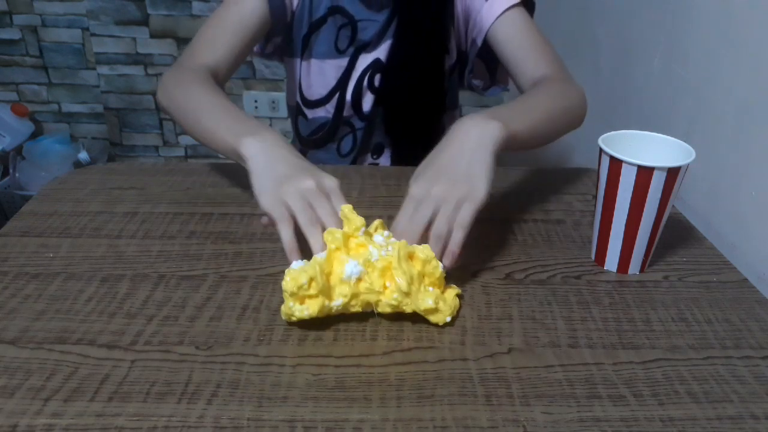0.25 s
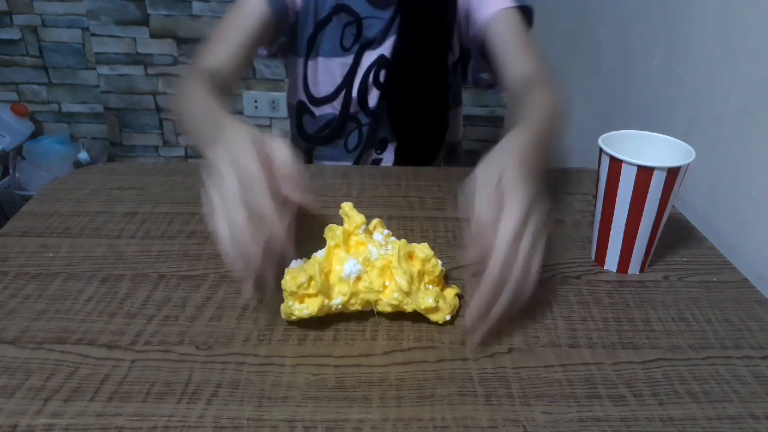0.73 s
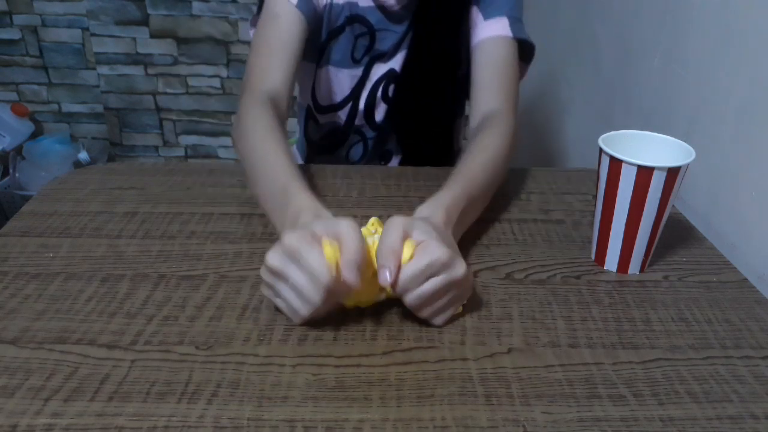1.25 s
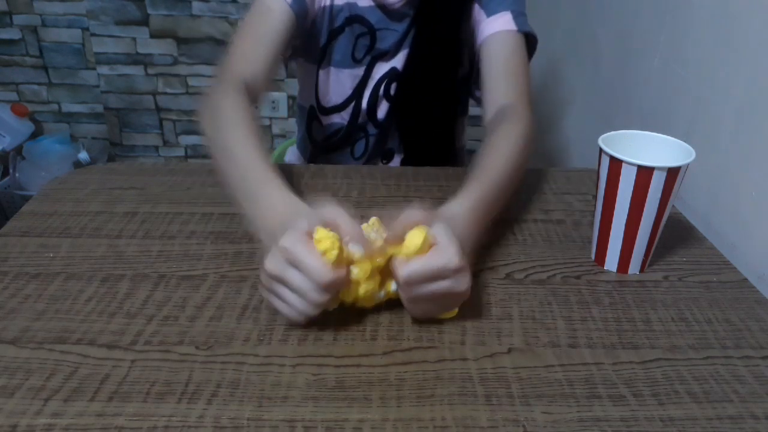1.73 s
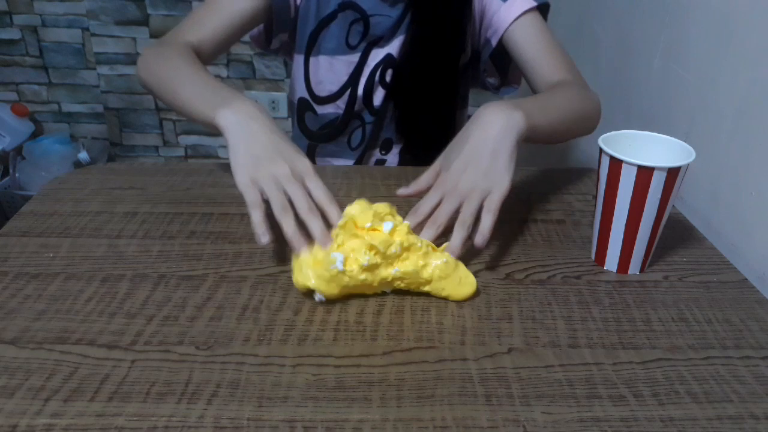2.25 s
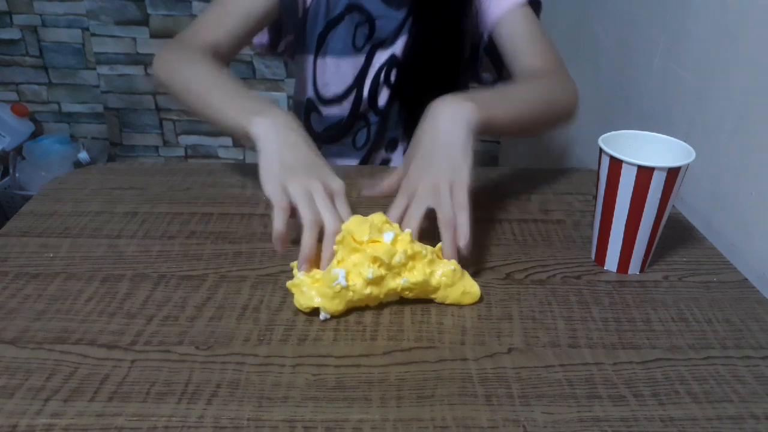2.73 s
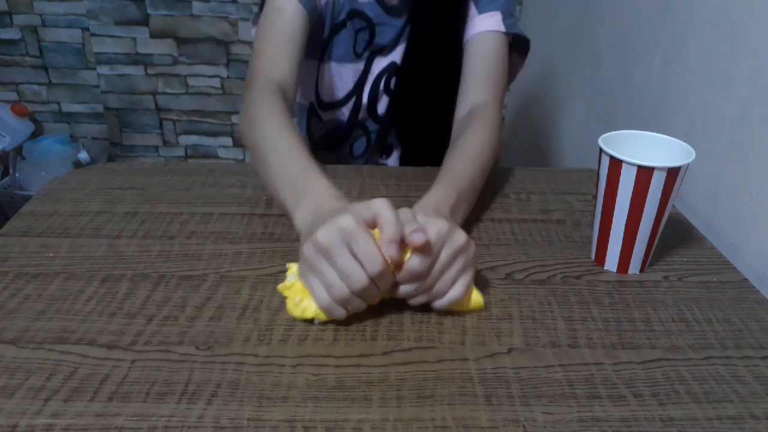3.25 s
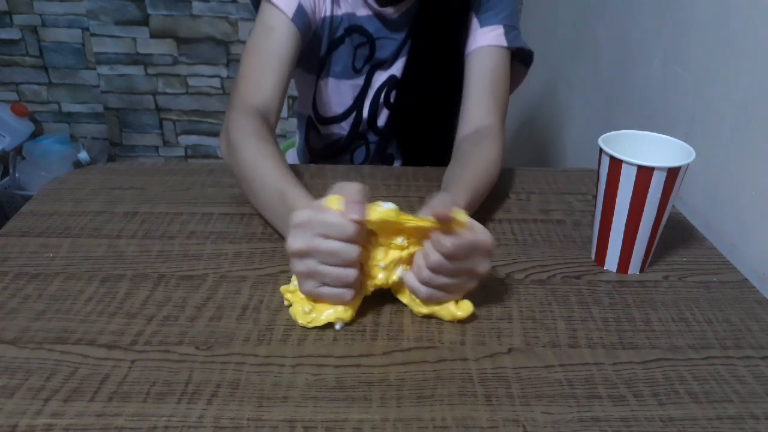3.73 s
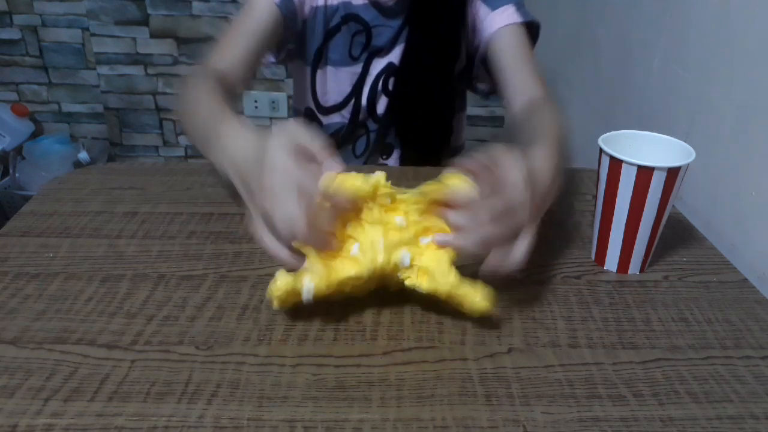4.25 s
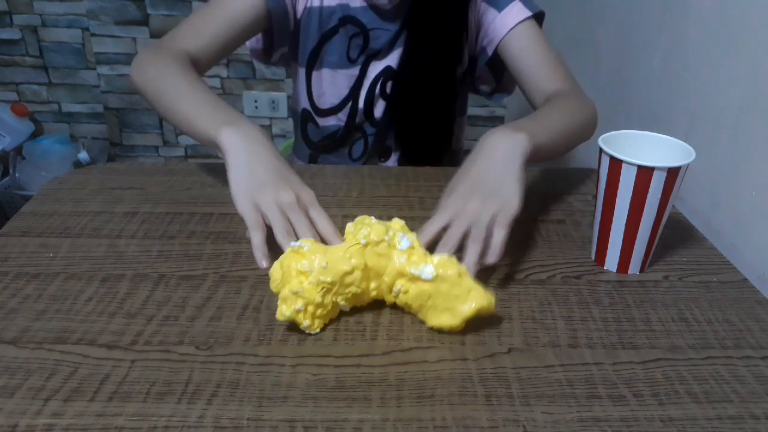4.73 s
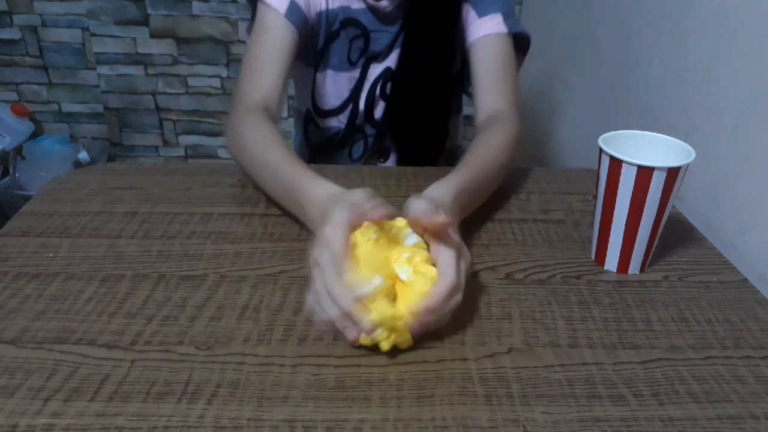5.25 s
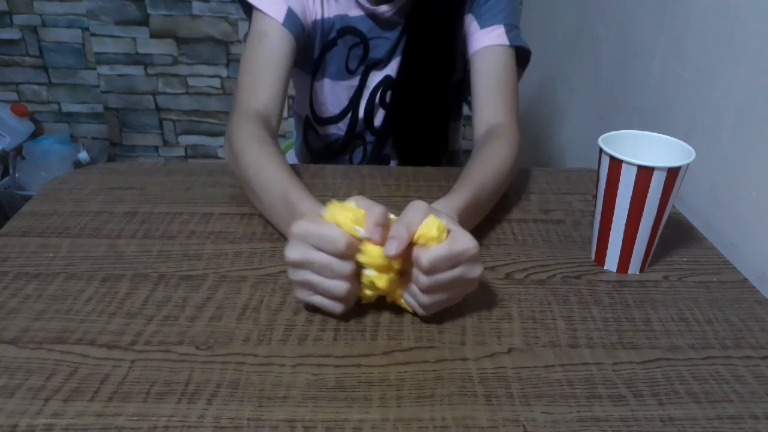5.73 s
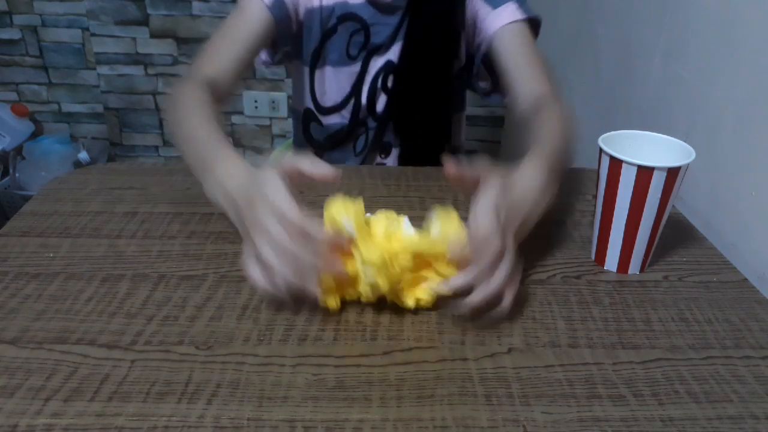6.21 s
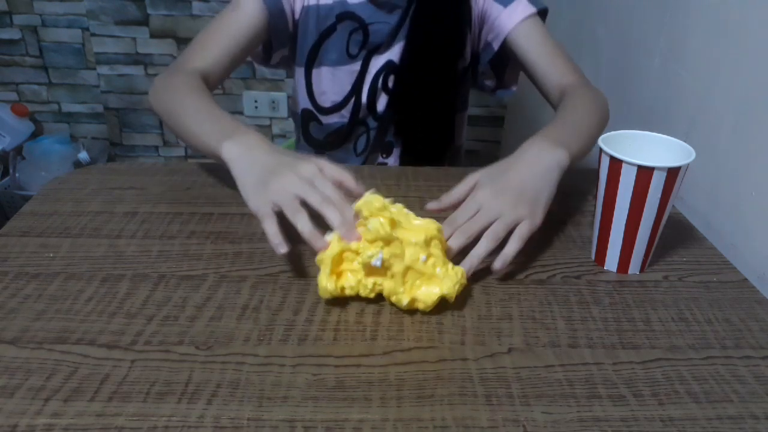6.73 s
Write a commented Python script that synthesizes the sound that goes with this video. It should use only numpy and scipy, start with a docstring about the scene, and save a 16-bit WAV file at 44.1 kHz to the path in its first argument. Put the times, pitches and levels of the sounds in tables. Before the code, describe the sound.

Two hands squeeze and pull a lump of sticky slime full of foam pieces on a wooden table. Raspy peeling and soft bumps come first, then wet squishing with snaps and plops. A dense crackling squeeze follows midway, then strong sticky tearing, another popping squeeze, a tiny squeak and a final rising peel. Close mono microphone in a small room with faint hush and hum.

```python
"""First comes a brief, faint rasp, then a soft bump and a tiny snap: hands knead sticky, foam-filled slime.
Slime peels off skin and wood in runs of tiny slips, made of clicks and short noise bursts.
It squishes as random clicks pass through wet-sounding filters; air pockets pop as dying sines.
Bumps, a knock and a faint drag sound the wooden table, in a small room with a quiet hush and hum."""
import sys
import numpy as np
from scipy import signal
from scipy.io import wavfile
from scipy.ndimage import uniform_filter1d

SR = 44100
rng = np.random.default_rng(int(sys.argv[2]) if len(sys.argv) > 2 else 0)


def put_to_file(sound):
    """Save the sound as 16-bit audio at rate SR, in the file named by the first command-line argument."""
    columns = np.atleast_2d(sound).T  # one column per channel
    safe = np.clip(columns, -1, 1)
    whole_steps = np.round(safe * 32767)
    wavfile.write(sys.argv[1], SR, whole_steps.astype(np.int16))


N = 307377
TIME = np.arange(N) / SR
EDGE_HZ = 16100  # upper band limit of the whole sound

# strips of slime peeling off: start t/s, length/s, level halfway/dB, swell from start to end/dB,
# mellow part relative to the level/dB, slips at the start/(1/s)
PEEL_STROKES = [(0.005, 0.053, -52, 2, -19.5, 325), (0.112, 0.28, -62, -15, -7, 227),
                (0.851, 0.07, -46.5, 2.5, 3, 460), (0.927, 0.045, -44, 2, -3, 405),
                (1.144, 0.055, -53, -1.5, 5, 410), (1.309, 0.27, -48.5, -3.5, -39, 610),
                (1.617, 0.25, -61, 0, -1.5, 360), (1.958, 0.19, -58, -2, -1, 350),
                (2.312, 0.29, -51.5, -6, -11.5, 490), (2.62, 0.096, -50.5, 2.5, -7.5, 850),
                (3.166, 0.25, -53, 6, -6, 122), (3.477, 0.3, -49.5, -0.5, -22, 65),
                (3.97, 0.32, -62, 1.5, -6, 600), (4.29, 0.115, -50.5, -5, -11, 546),
                (4.44, .15, -46, 1, -11.5, 513), (4.577, 0.22, -40, -3, -8.5, 455),
                (4.815, 0.05, -37.5, 2, -20, 550), (5.066, .2, -49, -1.5, -17, 490),
                (5.375, .18, -42, 0, -10, 463), (5.612, 0.1, -42, -2, -8.5, 178),
                (6.018, 0.038, -43, 0.5, -13.5, 570), (6.106, 0.13, -47.5, -10, -11, 470),
                (6.723, 0.097, -58.5, 4, 9, 260), (6.826, 0.23, -42, 13.5, -8, 88)]
# fingers pressing into the lump: start t/s, length/s, level halfway/dB, swell from start to end/dB,
# whether the lump rests on the table (True/False)
SQUEEZE_STROKES = [(0.087, 0.068, -53.5, -8, False), (0.495, 0.075, -58, 2, True),
                   (0.765, 0.043, -52, -15, False), (0.951, 0.14, -57.5, -4, True),
                   (1.106, 0.14, -52, 2.5, True), (1.339, 0.3, -63.5, -12, True),
                   (1.666, 0.6, -62.5, -18, True), (2.236, 0.029, -57.5, 11.5, True),
                   (2.752, 0.075, -54, 0, True), (3.031, .2, -63.5, 4.5, True),
                   (3.228, 0.515, -55, 3.5, False), (3.964, 0.12, -59, 22.5, True),
                   (4.87, 0.031, -49, -6, True), (5.08, 0.286, -63, 7, True),
                   (5.595, 0.37, -58.5, -3, False), (6.081, 0.16, -55.5, -2, True)]
# wet squelches as the fists wring the lump: start t/s, length/s, level halfway/dB,
# swell from start to end/dB, middle of the ringing band f/Hz
SQUELCH_STROKES = [(1.722, .04, -47.5, -3, 1680), (4.026, .16, -59, 3, 1330)]
# small air pockets snapping: t/s, level before trim and filter/dB, f/Hz
SNAP_EVENTS = [(0.11, -40, 5740), (0.3075, -50, 4560), (0.5039, -43, 3730), (1.0064, -31, 6160),
               (1.1533, -39, 10700), (1.2197, -15.5, 6440), (1.3605, -36, 5120), (1.6317, -46.5, 7650),
               (1.767, -39.5, 4080), (1.88, -46, 3200), (1.919, -42, 4540), (1.96, -49, 5900),
               (2.2128, -31, 6230), (2.794, -39.5, 3710), (3.1727, -43, 6940), (3.2773, -43, 3303),
               (3.3349, -40, 7780), (3.4273, -38.5, 8350), (3.444, -38, 8550), (3.4599, -19.5, 9820),
               (3.5121, -34.5, 8920), (3.5333, -33.5, 9500), (3.5549, -37, 3430), (3.588, -36, 8870),
               (3.5969, -17.5, 10200), (3.6617, -28.5, 10450), (3.715, -39.5, 5440), (3.735, -44.5, 6220),
               (3.821, -45.5, 7390), (4.431, -46.5, 8930), (4.985, -53, 9100), (5.014, -49, 8500),
               (5.0644, -42, 10200), (5.259, -45, 11500), (5.3798, -41.5, 6090), (5.5312, -35, 7470),
               (5.619, -34.5, 6415), (5.715, -32.5, 8080), (5.7221, -27, 9660), (5.7903, -10, 7700),
               (5.8922, -35, 9150), (5.925, -35, 8340), (5.939, -39.5, 7900), (6.532, -59, 4480),
               (6.583, -55.5, 5000), (6.6438, -18, 7640)]
# larger cavities opening with a wet plop: t/s, level/dB, starting f/Hz
PLOP_EVENTS = [(1.2, -20.5, 1309), (1.732, -19.5, 1970), (3.285, -33.5, 1600), (3.371, -35.5, 1735),
               (3.46, -25.5, 907), (3.554, -28.5, 1211), (3.596, -29, 796), (3.663, -24.5, 1479),
               (3.715, -27, 1659), (4.101, -36.5, 1090), (5.455, -24, 1521), (5.493, -21, 1707),
               (5.714, -25.5, 1497), (5.7898, -32, 1331)]
# bumps on the table: t/s, peak level/dB, f/Hz, time the soft contact takes to build/s
BUMP_EVENTS = [(0.099, -41.5, 218, 0.0043), (0.554, -39, 200, 0.0066), (0.77, -30.5, 237, 0.0015),
               (0.811, -27.5, 190.5, 0.0023), (1.765, -41.5, 202, 0.0073), (2.795, -37, 191.5, 0.0034),
               (4.054, -46, 210.7, 0.0043), (4.244, -40, 192.6, 0.0022), (4.288, -36.5, 184.9, 0.0018),
               (4.496, -30.5, 187.2, 0.0017), (4.9, -38, 200.2, 0.002), (5.092, -45, 207, 0.0037)]
# first reflections from walls and body: delay/s, level/dB
FIRST_REFLECTIONS = [(.0083, -17), (0.0156, -21)]
# tone colour of the crisp peeling and of the crackle: f/Hz, relative level/dB
CRISP_COLOUR = [(1500, -15), (3500, -12), (5200, -3.5), (6700, -3), (7700, -7.5), (10000, -5), (16000, -24)]
# tone colour of the mellow peeling: f/Hz, relative level/dB
MELLOW_COLOUR = [(900, -28.5), (1900, -21), (2600, -11), (4200, -13.5), (6500, -23), (16000, -31.5)]
# tone colour of the finest tearing threads: f/Hz, relative level/dB
FIZZ_COLOUR = [(7000, -24), (11000, 1.5), (16000, -6.5)]
# tone colour of the squishing: f/Hz, relative level/dB
SQUISH_COLOUR = [(120, -9.5), (350, -5.5), (700, -14), (1250, 2), (1900, -3.5), (3500, -5), (16000, -19)]
# tone colour of the background hush: f/Hz, relative level/dB
HUSH_COLOUR = [(25, -15.5), (50, -11.5), (80, 1), (200, 2), (640, -13), (2600, -20), (16000, -34.5)]

PEEL_ATTACK_S, PEEL_RELEASE_DB_PER_S = 0.028, 450
SQUEEZE_ATTACK_S, SQUEEZE_RELEASE_DB_PER_S = 0.014, 337
LET_GO_SLOWING = 0.68  # share of the slip rate lost by the time a strip comes free
GRIP_WAVER_DB = 1.17  # the pull is never quite even
PEEL_WETNESS_DB, SETTLING_DB = -18.5, -79  # pressing that goes with a peel; that of the lump at rest


def pulling(rest_db=-88, rest_slips_per_s=200):
    """Adds up all peels into strength, mellow strength and slip rate; strong strips count most in the rate."""
    power = np.full(N, gain_of(rest_db) ** 2)
    mellow_power = np.zeros(N)
    weighted_slips = power * rest_slips_per_s
    for s, length, db, swell_db, mellow_db, per_s in PEEL_STROKES:
        gain, progress = stroke(length, db, swell_db, PEEL_ATTACK_S, PEEL_RELEASE_DB_PER_S)
        slowing = 1 - LET_GO_SLOWING * progress ** 4
        add(power, s, gain ** 2)
        add(mellow_power, s, (gain * gain_of(mellow_db)) ** 2)
        add(weighted_slips, s, gain ** 2 * per_s * slowing)
    grip = gain_of(GRIP_WAVER_DB * drift(size=300))
    return grip * np.sqrt(power), grip * np.sqrt(mellow_power), weighted_slips / power


def peeling(pull, mellow_pull, slips_per_s, jitter_per_s=48, uneven_db=1.96, burst_s=0.0024, click=3,
            crisp_db=-3, mellow_db=-3, fizz_db=14, fizz_growth=1.544,
            mirror_s=0.000788, wander=0.088, mirror_db=-10):
    """The slime lets go in slips; each slip clicks and tears a little burst of fine threads."""
    jitter = jitter_per_s / (slips_per_s + jitter_per_s)  # slow peeling stumbles, fast peeling runs evenly
    slip_count = np.cumsum(slips_per_s * np.exp(jitter * drift(size=200))) / SR
    strength = gain_of(uneven_db * rng.standard_normal(N))[slip_count.astype(int)]
    # a burst is brief, so slow peeling ticks and fast peeling rasps
    tearing = strength * np.exp(-(slip_count % 1) / slips_per_s / burst_s)
    release = click * strength * np.diff(np.floor(slip_count), prepend=0)
    threads = release + tearing * rng.standard_normal(N)
    crisp = gain_of(crisp_db) * pull * steadied(colour(threads, CRISP_COLOUR))
    mellow = gain_of(mellow_db) * mellow_pull * steadied(colour(threads, MELLOW_COLOUR))
    # the finest threads come out mainly in a hard pull
    fine_threads = steadied(colour(tearing * rng.standard_normal(N), FIZZ_COLOUR))
    fizz = gain_of(fizz_db) * pull ** fizz_growth * fine_threads
    rasp = crisp + mellow + fizz
    # the nearby table top mirrors the rasp and gives it faint bands that wander slowly at random
    return rasp + gain_of(mirror_db) * delayed(rasp, mirror_s * SR * (1 + wander * drift(size=7000)))


def pressing(pull):
    """How hard the lump is worked (squeezes, a share of each peel, settling), and how hard on the table."""
    power = gain_of(SETTLING_DB) ** 2 + (gain_of(PEEL_WETNESS_DB) * pull) ** 2
    table_power = np.zeros(N)
    for s, length, db, swell_db, on_table in SQUEEZE_STROKES:
        gain, _ = stroke(length, db, swell_db, SQUEEZE_ATTACK_S, SQUEEZE_RELEASE_DB_PER_S)
        add(power, s, gain ** 2)
        add(table_power, s, on_table * gain ** 2)
    return np.sqrt(power), np.sqrt(table_power)


def squishing(press, per_s=550, spread_db=-0.5, level_db=-1):
    """Small wet cells collapse between the fingers."""
    return gain_of(level_db) * press * steadied(colour(ticks(per_s, spread_db), SQUISH_COLOUR))


def crackling(press, per_s=70, spread_db=1.0, level_db=-7):
    """Tiny air pockets snap at random under the fingers."""
    return gain_of(level_db) * press * evened(colour(ticks(per_s, spread_db), CRISP_COLOUR))


def bubbling(press, per_s=80, spread_db=3.5, low_hz=900, high_hz=2100, cycles=0.61, level_db=-6, count=7):
    """Small cavities of several sizes open at random inside the squeezed lump."""
    t = TIME[:SR // 100]
    bubbles = np.zeros(N)
    for hz in np.geomspace(low_hz, high_hz, count):
        bubbles += signal.oaconvolve(ticks(per_s / count, spread_db), ring(hz, cycles / hz, t))[:N]
    return gain_of(level_db) * press * evened(bubbles)


def squelching(q=1.23, per_s=1600, spread_db=0.0):
    """Air and wet slime are forced through a gap between the fingers, which rings broadly."""
    out = np.zeros(N)
    for s, length, db, swell_db, hz in SQUELCH_STROKES:
        gain, _ = stroke(length, db, swell_db, SQUEEZE_ATTACK_S, SQUEEZE_RELEASE_DB_PER_S)
        widening = 1 + 0.5 / q
        gap = signal.butter(2, [hz / widening, hz * widening], "band", fs=SR)
        spurts = ticks(per_s, spread_db)[:len(gain)]
        add(out, s, gain * evened(signal.lfilter(*gap, spurts)))
    return out


def snaps(life_s=0.000085, low_hz=900, high_hz=15000, trim_db=-1, size=176):
    """The skin of a small air pocket breaks with a very short ring."""
    out, t = np.zeros(N), np.arange(size) / SR
    for s, db, hz in SNAP_EVENTS:
        add(out, s, gain_of(db + trim_db) * evened(ring(hz, life_s, t)))
    return signal.lfilter(*signal.butter(1, [low_hz, high_hz], "band", fs=SR), out)


def plops(cycles=1.0, glide=0.099, size=700):
    """A larger cavity opens and rings for a cycle or two, rising as its mouth widens."""
    out, t = np.zeros(N), np.arange(size) / SR
    for s, db, hz in PLOP_EVENTS:
        rising_hz = hz * (1 + glide * t / t[-1])
        add(out, s, gain_of(db) * ring(rising_hz, cycles / hz, t))
    return out


def table_bounce(x, delay_s=0.00074, wander=0.11):
    """The mirror image of a pop in the table top; the short delay wanders slowly at random."""
    return 0.5 * delayed(x, delay_s * SR * (1 + wander * drift(size=9000)))


def scatter(x, life_s=0.001, level_db=-3, low_hz=4500, high_hz=10000):
    """Fingers and foam scatter each pop into a brief ragged crack: noise that follows its treble."""
    keep = np.exp(-1 / (life_s * SR))
    band = signal.butter(1, [low_hz, high_hz], "band", fs=SR)
    power = signal.lfilter([1 - keep], [1, -keep], signal.lfilter(*band, x) ** 2)
    noise = evened(signal.lfilter(*band, rng.standard_normal(N)))
    return gain_of(level_db) * np.sqrt(power) * noise


def hollow(s=5.493, hz=480, width_hz=230, pop_db=-27, pop_s=0.0046, puff_db=-42, puff_s=0.026):
    """A large pocket bursts between the cupped hands, and its puff of air sounds their hollow."""
    t, out = TIME[:SR // 5], np.zeros(N)
    band = signal.butter(2, [hz - width_hz / 2, hz + width_hz / 2], "band", fs=SR)
    air = evened(signal.lfilter(*band, rng.standard_normal(len(t))))
    pop = gain_of(pop_db) * ring(hz, pop_s, t)
    puff = gain_of(puff_db) * air * np.exp(-t / puff_s)
    add(out, s, pop + puff)
    return out


def squeak(s=6.116, length_s=0.01275, base_start_hz=2400, base_end_hz=2000, level_db=-36):
    """Air escapes through a pinhole in one short falling chirp, made of harmonics 3 to 6 of the base."""
    turns = np.cumsum(np.linspace(base_start_hz, base_end_hz, round(length_s * SR))) / SR
    flutter = sum(np.sin(2 * np.pi * k * turns) / (1 + abs(k - 5)) for k in range(3, 7))
    out = np.zeros(N)
    add(out, s, gain_of(level_db) * evened(flutter) * signal.windows.tukey(len(turns)))
    return out


def bumps(life_s=0.011, thud_db=-13, thud_s=0.0017):
    """A soft blow sets the table top booming, with a dull knock on top; softer blows build and fade slower."""
    out, t = np.zeros(N), np.arange(SR // 5) / SR
    band = signal.butter(2, [100, 500], "band", fs=SR)
    dull = evened(signal.lfilter(*band, rng.standard_normal((len(BUMP_EVENTS), len(t)))))
    for (s, db, hz, rise_s), noise in zip(BUMP_EVENTS, dull):
        boom = ring(hz, life_s + rise_s, t)
        thud = gain_of(thud_db) * noise * np.exp(-t / (thud_s + 2 * rise_s))
        blow = (boom + thud) * (1 - np.exp(-t / rise_s))
        add(out, s, gain_of(db) * blow / abs(blow).max())
    return out


def knock(s=0.77, hz=721, life_s=0.013, level_db=-42):
    """A knuckle strikes the table top and rings its higher, woody note."""
    out = np.zeros(N)
    add(out, s, gain_of(level_db) * ring(hz, life_s, TIME[:SR // 5]))
    return out


def thrumming(press, low_hz=155, high_hz=235, level_db=-3):
    """The pressed lump drags on the table top, which hums faintly: a narrow band of noise."""
    band = signal.butter(2, [low_hz, high_hz], "band", fs=SR)
    return gain_of(level_db) * press * evened(signal.lfilter(*band, rng.standard_normal(N)))


def room(x, wet_db, t60_s=0.23, onset_s=0.0096, top_hz=11000, count=3):
    """A few close reflections and a short dense tail that changes slowly in a steady cycle."""
    t, out = TIME[:SR // 2], x.copy()
    for k in range(count):
        tail = rng.standard_normal(len(t)) * gain_of(-60 * t / t60_s) * (1 - np.exp(-(t / onset_s) ** 2))
        tail = signal.lfilter(*signal.butter(1, top_hz, fs=SR), tail)
        # the tails take turns
        share = np.sqrt(2 / count) * np.cos(np.pi * (TIME + k / count))
        out += gain_of(wet_db) * signal.oaconvolve(x * share, tail / np.linalg.norm(tail))[:N]
    for delay_s, db in FIRST_REFLECTIONS:
        add(out, delay_s, gain_of(db) * x)
    return out


def background_hush(level_db=-61.0):
    """A steady, soft noise, strongest in the bass."""
    return gain_of(level_db) * evened(colour(rng.standard_normal(N), HUSH_COLOUR))


def background_hum(hz=120, peak_db=-67.0):
    """A steady, faint low sine."""
    return gain_of(peak_db) * np.sin(2 * np.pi * hz * TIME)


def stroke(length, db, swell_db, attack_s, release_db_per_s):
    """Gain and progress (0-1) of one hand movement: it takes hold, swells or eases, and lets go."""
    t = np.arange(0, length + 1 / 4, 1 / SR)  # a quarter second is left for the release
    progress = np.minimum(t / length, 1)
    level_db = db + swell_db * (progress - 0.5) - release_db_per_s * np.maximum(t - length, 0)
    return np.minimum(t / attack_s, 1) * gain_of(level_db), progress


def ticks(per_s, spread_db):
    """Random clicks of either sign; the spread makes their sizes uneven."""
    size = gain_of(spread_db * np.minimum(rng.exponential(1, N), 4))
    return size * rng.choice([-1, 1], N) * (rng.random(N) < per_s / SR)


def ring(hz, life_s, t):
    """A dying sine; life is the time in which it falls to 1/e."""
    return np.sin(2 * np.pi * hz * t) * np.exp(-t / life_s)


def drift(size):
    """Slow random wandering of unit strength, smoothed over size samples."""
    return evened(uniform_filter1d(uniform_filter1d(rng.standard_normal(N), size), size))


def delayed(x, delay_samples):
    """Sound that arrives late, by a delay that may change over time."""
    return np.interp(np.arange(N) - np.round(delay_samples), np.arange(N), x)


def colour(x, points, size=2048):
    """Causal filter with the given spectrum, so that clicks keep their sharp front."""
    hz, db = np.transpose(points)
    bin_hz = abs(np.fft.fftfreq(size, 1 / SR)) + 1
    log_gain = np.log(gain_of(np.interp(np.log(bin_hz), np.log(hz), db)))
    # minimum phase packs the energy as early as possible
    response = np.fft.ifft(np.exp(signal.hilbert(log_gain).conj())).real[:size // 2]
    return signal.oaconvolve(x, response)[:N]


def steadied(x, size=1300):
    """Holds the short-time power near one and leaves the grain."""
    power = uniform_filter1d(uniform_filter1d(x ** 2, size), size)
    return x / np.sqrt(abs(power) + 1e-9)


def evened(x):
    """Scales a sound to an overall (RMS) strength of one."""
    return x / np.sqrt(np.mean(x ** 2) + 1e-20)


def gain_of(db):
    """Turns decibels into a plain factor."""
    return 10 ** (np.asarray(db) / 20)


def add(mix, s, sound):
    """Adds a sound into the mix, starting at s seconds."""
    part = mix[max(round(s * SR), 0):][:len(sound)]
    part += sound[:len(part)]


def scene():
    """The hand movements drive the kneading; pops, table and background join it."""
    pull, mellow_pull, slips_per_s = pulling()
    press, table_press = pressing(pull)
    kneading = peeling(pull, mellow_pull, slips_per_s) + squishing(press) + crackling(press) + bubbling(press)
    pops = snaps() + plops()
    slime = room(kneading + squelching() + squeak() + hollow() + pops, wet_db=-11)
    slime += table_bounce(pops) + scatter(pops)
    slime = signal.lfilter(*signal.butter(2, 130, "high", fs=SR), slime)  # small sources radiate little bass
    table = bumps() + knock() + thrumming(table_press)
    table = signal.lfilter(*signal.butter(2, 70, "high", fs=SR), table)
    mono = slime + room(table, wet_db=-9) + background_hush() + background_hum()
    return np.array([mono, mono])


def record(dry, ring_hz=8880, width_hz=480, ceiling=0.5):
    """A small mono microphone: one treble resonance, soft rounding of loud peaks, then the band limit."""
    heard = dry + signal.lfilter(*signal.iirpeak(ring_hz, ring_hz / width_hz, fs=SR), dry)
    heard = ceiling * np.tanh(heard / ceiling)
    band_limit = signal.firwin(511, EDGE_HZ, window=("kaiser", 9), fs=SR)
    return signal.oaconvolve(heard, band_limit[None], "same")


dry = scene()
out = record(dry)
put_to_file(out)
```